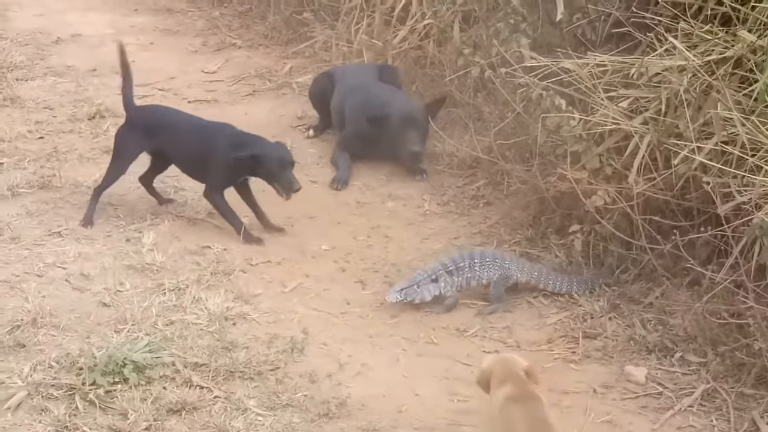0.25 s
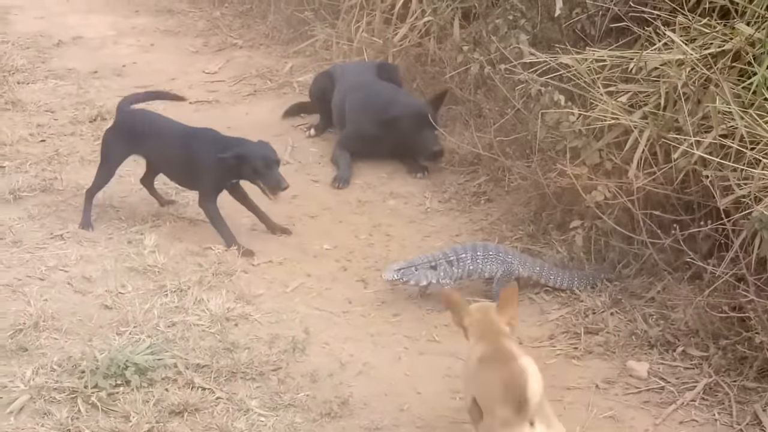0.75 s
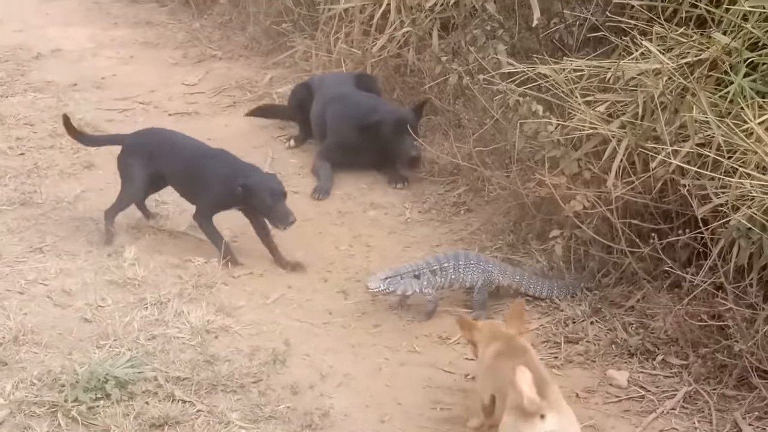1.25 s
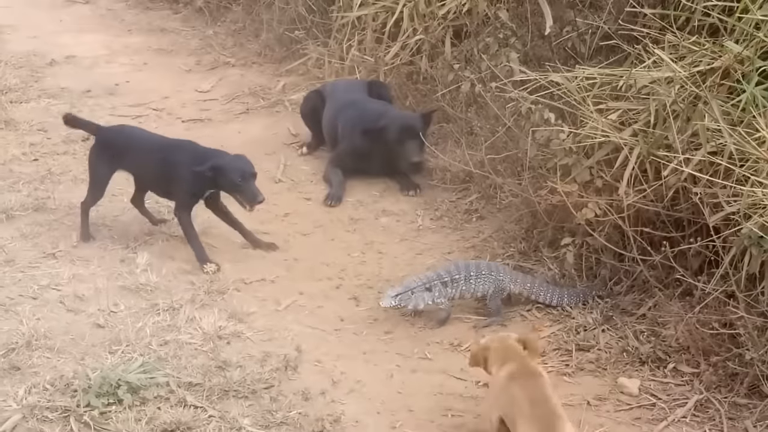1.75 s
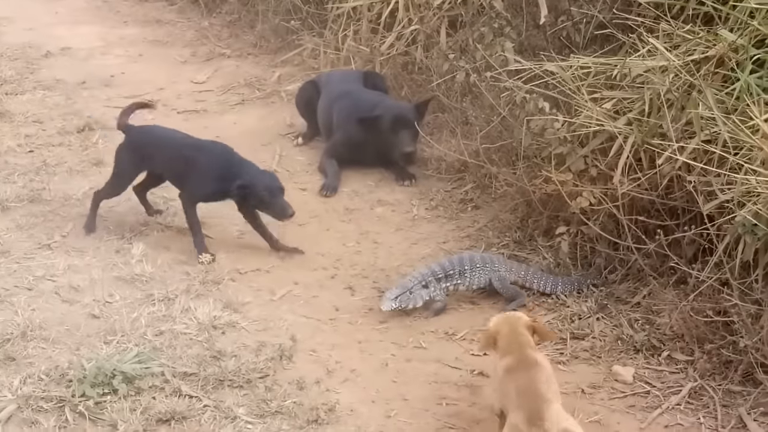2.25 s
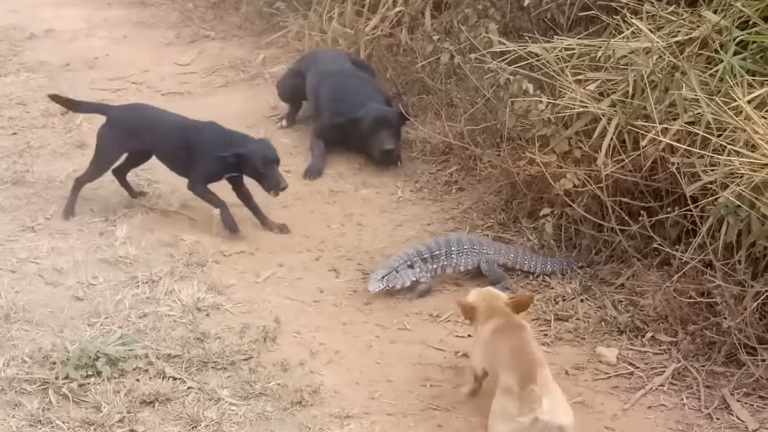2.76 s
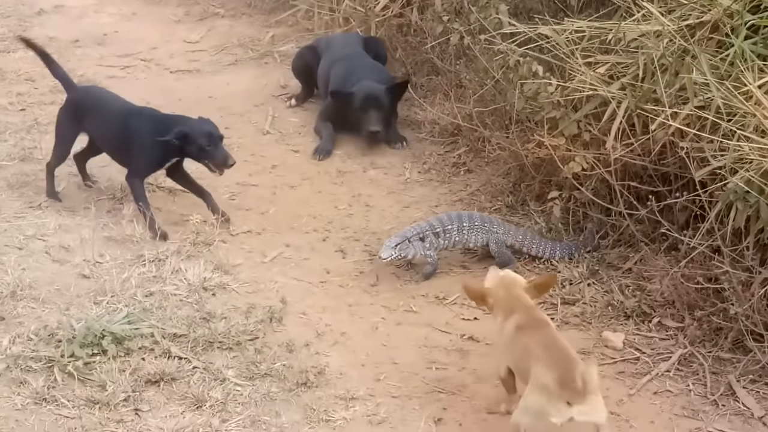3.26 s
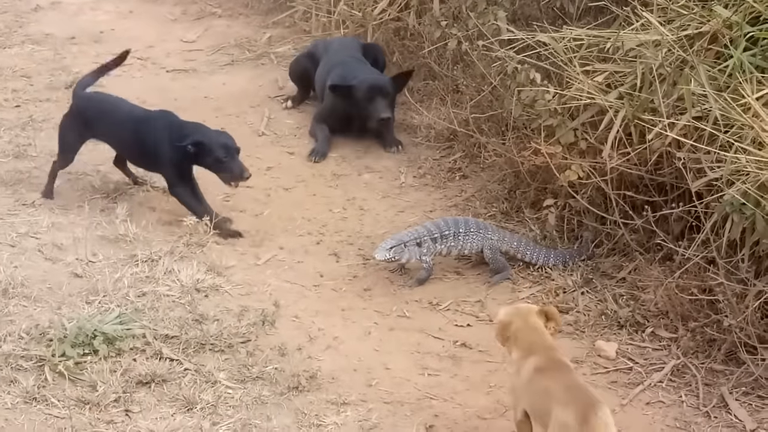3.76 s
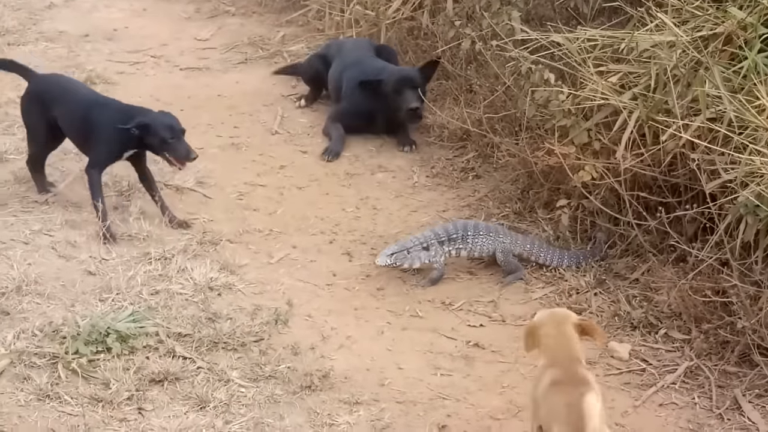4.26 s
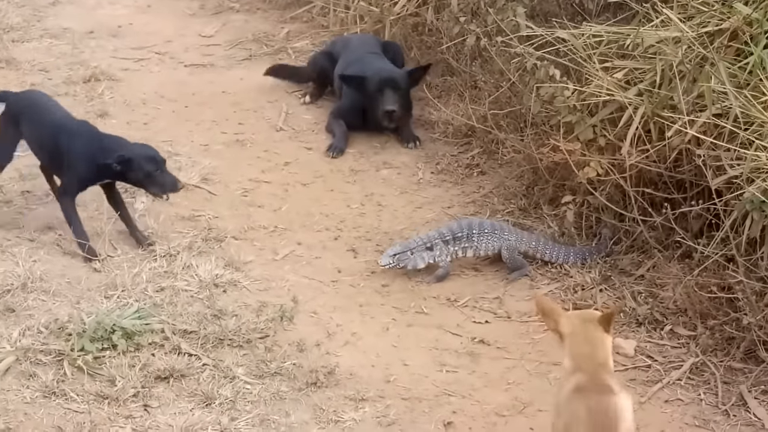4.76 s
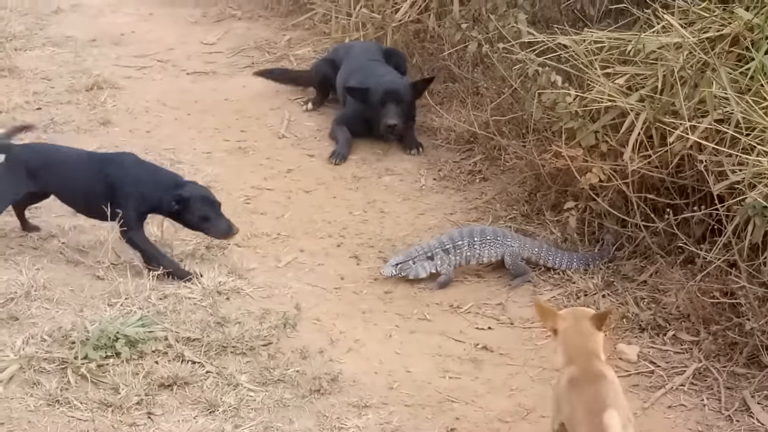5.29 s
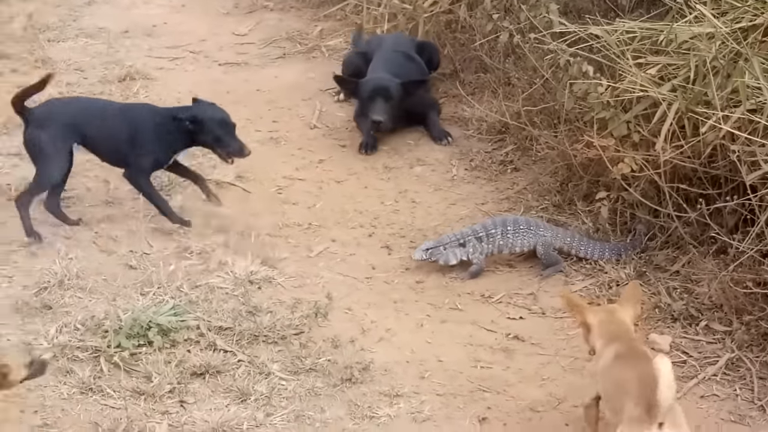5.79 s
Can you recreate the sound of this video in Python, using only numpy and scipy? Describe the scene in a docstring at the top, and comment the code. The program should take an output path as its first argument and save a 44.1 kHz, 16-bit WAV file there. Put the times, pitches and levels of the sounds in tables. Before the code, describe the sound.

Outdoors on a dirt path, several excited dogs keep up a rapid volley of piercing yelps, raspy yaps and rough barks, each arching quickly in pitch. Paws scrape softly in the dust. One dog moans low around the middle, beside a short grass rustle, and later one gives a wavering whine, followed by a few twig ticks. The bushes echo faintly, and the nearby hand-held microphone picks up low rumble and closing finger knocks.

```python
"""On a dirt path, three dogs shriek, yap, yelp and bark at a lizard, with a whine and a low moan between.
Each sharp call is an arch of pitch: the vocal folds start hoarse, often jump register, clear at the top
and slide away, coloured by throat and mouth. Paws scuff the dust, grass rustles and dry stalks crack.
The brush answers faintly; the hand-held microphone rumbles and a limiter levels the loudest calls."""
import sys
import numpy as np
from scipy import signal
from scipy.fft import rfft, irfft, next_fast_len
from scipy.io import wavfile
from scipy.ndimage import uniform_filter1d, minimum_filter1d, map_coordinates

SR = 44100
rng = np.random.default_rng(int(sys.argv[2]) if len(sys.argv) > 2 else 0)


def digitize_waveform(pressure):
    """Quantize a signal to 16-bit integers and store it at the path in sys.argv[1].

    Rows of a 2-D input are taken as channels; values are limited to [-1, 1].
    """
    field = np.atleast_2d(pressure).T
    bounded = np.clip(field, -1, 1)
    quanta = np.round(bounded * 32767).astype(np.int16)
    wavfile.write(sys.argv[1], SR, quanta)


N = 265923
TOP_HZ = 15800
# Dull hiss of dust and of outdoor air: (frequency [Hz], level [dB])
SOFT_HISS = [(30, -31), (90, -14.5), (600, -1), (2000, -23.5), (12000, -41.5)]
# The arch that yelps and squawks share
YELP_ARCH = dict(climb_bend=1.5, drop_bend=3.1, sag_db=9, fade_db=22.5, kink=.4, let_go_db=2,
                 clear_db=4.5, tail=1.4)


def amp(db):
    """Decibels to gain."""
    return np.exp(np.asarray(db) * (np.log(10) / 20))


def along(points, hz):
    """(Hz, value) points read on a log axis."""
    f, v = np.transpose(points)
    return np.interp(np.log(hz + 1), np.log(f + 1), v)


def wobble(rate, size):
    """A smooth random curve with rate knots a second."""
    knots = rng.standard_normal(int(size * rate / SR) + 4)
    return map_coordinates(knots, [np.arange(size) * rate / SR], mode="nearest")


def wander(count, rate, size):
    """A stack of count random zigzags with rate knots a second."""
    at, part = np.divmod(np.arange(size) * rate / SR, 1)
    at = at.astype(int)
    knots = np.float32(rng.standard_normal((count, at[-1] + 2)))
    return knots[:, at] + np.diff(knots)[:, at] * np.float32(part)


def coloured(x, spectrum):
    """x shaped by a spectrum, at rms 1."""
    m = next_fast_len(len(x) + 1024)
    shaped = irfft(rfft(x, m) * amp(along(spectrum, np.fft.rfftfreq(m, 1 / SR))), m)[:len(x)]
    return shaped / np.sqrt(np.mean(shaped ** 2) + 1e-20)


def add(track, s, sound):
    """Mix a sound into the track from time s on."""
    at = round(s * SR) + np.arange(len(sound))
    inside = (at >= 0) & (at < len(track))
    track[at[inside]] += sound[inside]


def arch(row, climb_bend, drop_bend, sag_db, fade_db, kink, let_go_db, clear_db=0, tail=1):
    """One push of air: the voice scoops up, breaks into a clear top, lets go and slides away."""
    start, rise, fall, top_hz, climb, drop, break_s, leap, tone_db, rasp_db, late_rasp_db, _ = row
    switch_s, lead_s = .003, .04  # a register change; how long before the top the push eases
    let_go = .57  # share of the fall after which the folds release
    t = np.arange(0, rise + fall * tail, 1 / 1000)
    climbing, falling = np.clip(1 - t / rise, 0, 1), np.maximum((t - rise) / fall, 0)
    chest = (1 - np.tanh((t - break_s) / switch_s)) / 2
    released = (1 + np.tanh((t - rise - let_go * fall) / switch_s)) / 2
    # Higher bends flatten the top; kink blends in straight glides with sharp corners.
    rounded = climb * climbing ** climb_bend + drop * falling ** drop_bend
    straight = climb * np.maximum(1 - t / break_s, 0) + drop * np.maximum(falling - let_go, 0) / (1 - let_go)
    octaves_down = np.minimum((1 - kink) * rounded + kink * straight + leap * chest, 2)
    slack = np.maximum(octaves_down, 0) * (1 - .32 * chest)  # the chest register carries low notes better
    easing = np.clip((t - rise + lead_s) / (fall + lead_s), 0, 1)
    push_db = -fade_db * easing ** 3.3 - let_go_db * released
    tone = tone_db + push_db - sag_db * slack + clear_db * (1 - chest)
    rasp = chest * rasp_db + (1 - chest) * late_rasp_db + push_db
    return np.transpose([start + t, top_hz / 2 ** octaves_down, tone, rasp, chest])


def throat_of(voice):
    """The resonances of throat and mouth for one kind of call."""
    # Open mouth: (frequency [Hz], shriek [dB], yelp [dB], yap [dB], bark [dB])
    open_mouth = [(266, -39.5, -25, -11, -19.5), (453, -13.5, -8, -5.5, -18.5), (703, 0.5, -16.5, 2.5, -4),
                  (1094, -1.5, 0, 8, 8), (1554, 1.5, 16, 14.5, 7), (1750, 8.5, 8, -12, -2),
                  (2385, 4.5, 16.5, 2.5, 1), (2665, 2, -10, -8.5, -8), (3270, -17.5, -6, -10, -15.5),
                  (4565, -11.5, -3, -19.5, -22.5), (5650, -16.5, -27.5, -30, -29.5),
                  (5988, -32.5, -31.5, -39, -35.5), (7270, -12, -15.5, -18, -18.5),
                  (8520, -32, -34.5, -35, -26), (8540, -45.5, -42.5, -38.5, -24.5),
                  (16000, -48.5, -36.5, -53.5, -50.5)]
    # Nearly closed muzzle: (frequency [Hz], level [dB])
    muzzle = [(300, -20), (580, 9.5), (1100, 2.5), (1800, 8.5), (2500, -14), (3400, -2.5), (4500, -36.5),
              (6000, -32), (12000, -55.5)]
    if voice == "muzzle":
        return muzzle
    column = 1 + ("shriek", "yelp", "yap", "bark").index(voice)
    return [(row[0], row[column]) for row in open_mouth]


def call(contour, voice, slope_db, doubling, jitter, rasp_db, breath_db, chaos,
         treble_db=0, bite_db=-60, fray=.27, ripple_db=6, growl=.3):
    """Vocal folds turn chaotic as rasp takes over, heard through the mouth; gives (start, sound)."""
    # The blast of air that opens a call: (frequency [Hz], level [dB])
    blast = [(400, -25.5), (1000, -3.5), (1500, -3), (2300, -2), (3100, -14.5), (4500, -10), (5500, -13.5),
             (6200, -35.5), (7600, -16), (8900, -45.5), (15000, -58.5)]
    fade_s, swell_s, bite_s = .005, .021, .041
    slip_hz, growl_hz, ripple_spacing_hz = 260, 134.1, 328.3
    s, *curves = np.transpose(contour)
    t = np.arange(s.min() - fade_s, s.max() + fade_s, 1 / SR)
    n, age = len(t), t - t[0]
    pitch, tone, rasp, chest = [uniform_filter1d(np.interp(t, s, c), size=120) for c in curves]
    # A wide-open mouth lifts the treble band.
    throat, blast = [[(hz, db + treble_db * (2900 < hz < 6000)) for hz, db in colour]
                     for colour in (throat_of(voice), blast)]
    hoarse = 1 / (1 + amp(tone - rasp))
    order = np.arange(.5, min(11, TOP_HZ / pitch.max()), .5)[:, None]
    halfway = order % 1 > 0  # paired cycles sound between the harmonics
    # Hoarse folds lurch in pitch as well as trembling from cycle to cycle.
    lurch = .016 * wobble(80, n)
    quaver = .005 * (wobble(52.6, n) + wobble(120, n))
    pitch = pitch * (1 + quaver + hoarse * chaos * (lurch + jitter * wobble(350, n)))
    phase = np.float32(order * (2 * np.pi * np.cumsum(pitch) / SR) + rng.uniform(0, 2 * np.pi, order.shape))
    slip = wander(len(order), slip_hz, n)
    # Gliding overtones flare and break in the mouth's narrow peaks and dips.
    grid = np.arange(0, TOP_HZ, 40)
    ripple = ripple_db * wander(1, SR * 40 / ripple_spacing_hz, len(grid))[0]
    mouth_db = along(throat, grid) + ripple * np.clip(grid / 2900, 0, 1) ** 2
    flicker_db = 7 * wander(len(order), 45, n) * (order > 1)
    mouth = amp(np.interp(order * pitch, grid, mouth_db) + flicker_db)
    # Regular vibration: harmonics grow duller once the push of air is spent.
    spent_db = (tone.max() - tone) * (t > t[tone.argmax()])
    tilt_db = slope_db * (1 - hoarse) - .086 * np.minimum(spent_db, 20)
    clean = mouth * amp(tilt_db * np.log2(np.maximum(order, 1)))
    clean *= np.where(halfway, doubling * np.maximum(hoarse, chest), 1)
    voiced = partials(clean, np.sin(phase + fray * (order - 1) * slip))
    # Rough vibration: cycles pair up and slip; low partials keep a core, high ones smear into noise.
    ragged = mouth * np.where(halfway, doubling, 1) * np.minimum(order, 1)
    rattle = partials(ragged, np.cos(phase + chaos * np.sqrt(order) * slip))
    # Air escapes in puffs, one for each pair of cycles; the first blast bites before the folds settle.
    puffs = 1 + np.cos(phase[0])
    breath = amp(breath_db) * coloured(puffs * rng.standard_normal(n), throat)
    bite = coloured(puffs * rng.standard_normal(n), blast)
    bite *= amp(bite_db + tone.max()) * np.exp(-(age / bite_s) ** 2)
    judder = amp(2 * wobble(130, n))
    shimmer_db = 3 * hoarse * wobble(300, n)
    sound = voiced * amp(tone + shimmer_db) + judder * ((rattle + breath) * amp(rasp + rasp_db) + bite)
    # Loose tissue above the folds flaps, chopping the voice into uneven beats.
    flap = 2 * np.pi * np.cumsum(growl_hz * (1 + .2 * wobble(90, n))) / SR
    sound *= 1 + growl * hoarse * np.cos(flap)
    swell = 1 - np.exp(-age / swell_s)
    gate = np.clip(np.minimum(age, t[-1] - t) / (2 * fade_s), 0, 1)
    return t[0], sound * swell * np.sin(gate * np.pi / 2) ** 2


def partials(gains, waves):
    """Weighted waves summed at steady power."""
    return (gains * waves).sum(0) / np.sqrt((gains ** 2).sum(0) / 2)


def volley(rows, shape, voice, **folds):
    """A track of arched calls, one for each row."""
    track = np.zeros(N)
    for row in rows:
        add(track, *call(arch(row, **shape), voice, treble_db=row[-1], **folds))
    return track


def muzzled(points, rasp_offset_db, slope_db):
    """One long call from relaxed folds through a nearly closed muzzle, its rasp far under its tone."""
    contour = [(s, hz, db, db + rasp_offset_db, 0) for s, hz, db in points]
    track = np.zeros(N)
    add(track, *call(contour, "muzzle", slope_db, doubling=.04, jitter=.006, rasp_db=0,
                     breath_db=-15, chaos=.8, fray=.06, ripple_db=3))
    return track


def shrieks():
    """Thin, high calls: the folds ring nearly pure at the top."""
    # Shrieks: (start [s], rise [s], fall [s], top [Hz], climb [oct], drop [oct], break after start [s],
    # leap [oct], tone [dB], early rasp [dB], late rasp [dB], treble [dB])
    calls = [ (-.04, 0.067, 0.041, 2089, 0.28, 0.7, 0.027, 0.07, -9.5, -20, -17, 8.5),
             (.548, 0.09, 0.04, 2131, 1.25, 0.56, 0.046, 0, -11, -11.5, -15.5, 5.5),
             (1.165, 0.081, 0.013, 2246, 0.34, 0.031, 0.036, 0.036, -20, -21.5, -25, 5.5),
             (1.584, 0.081, 0.049, 2077, 1.2, 0.26, 0.062, -0.028, -11.5, -11, -7.5, 3),
             (2.108, 0.044, 0.044, 1768, .2, 0.21, .039, -0.37, -8, -46, -40.5, -4.5),
             (2.191, 0.042, 0.053, 1697, 1.4, 0.049, 0.025, -0.094, -11, -21, -18.5, 7.5),
             (2.241, 0.024, 0.041, 2078, 0.16, 0.2, 0.013, -0.03, -7, -9, -3, -1),
             (2.672, 0.051, 0.021, 2144, 0.0071, 0.1, 0.034, 0.15, -13, -19, -21.5, -12),
             (2.981, 0.055, .045, 2118, 0.78, 0.45, .04, 0.12, -10, -10.5, -25, 2),
             (4.141, 0.016, 0.037, 2058, 0.16, 0.13, 0.014, -0.093, -15, -13.5, -10, -1.5),
             (4.468, 0.07, 0.049, 2113, 0.57, 0.34, 0.033, 0.068, -9, -29.5, -39, 4),
             (5.765, 0.068, 0.04, 2243, 0.96, 0.84, 0.031, 0.051, -10.5, -24, -30, 9.5), ]
    shape = dict(climb_bend=2.3, drop_bend=2.5, sag_db=15.5, fade_db=18.5, kink=.22, let_go_db=5)
    return volley(calls, shape, "shriek", slope_db=-2, doubling=.18, jitter=.016,
                  rasp_db=-8, breath_db=-3, chaos=1)


def yaps():
    """Raspy calls whose pitch turns sharp corners."""
    # Yaps: (start [s], rise [s], fall [s], top [Hz], climb [oct], drop [oct], break after start [s],
    # leap [oct], tone [dB], early rasp [dB], late rasp [dB], treble [dB])
    calls = [ (-.03, 0.057, 0.072, 1439, 0.46, 1.6, 0.05, 0.073, -18.5, -28.5, -45.5, 2),
             (0.587, 0.044, 0.1, 1541, 0.25, 2, 0.026, 0.1, -15.5, -23.5, -28, 10),
             (0.781, 0.075, 0.077, 1463, 0.98, 1.3, .051, .03, -13, -17, -56, 7),
             (1.105, 0.081, 0.098, 1502, 1.1, 0.84, 0.045, 0.011, -15, -28.5, -20, 7),
             (1.316, 0.083, 0.078, 1356, 1.2, .85, 0.054, 0.076, -10.5, -18, -55.5, -5.5),
             (1.693, 0.061, 0.041, 1603, 0.55, 0.55, 0.041, 0.05, -17.5, -14.5, -32.5, 6),
             (1.88, 0.07, 0.099, 1366, .85, 2, .044, 0.06, -11.5, -18.5, -37, 2.5),
             (2.241, 0.044, 0.1, 1457, 0.089, 0.19, 0.033, 0.013, -21, -20, -15, 0.5),
             (2.421, .098, 0.07, 1357, 1.05, 1.7, 0.055, 0.043, -12.5, -19.5, -52.5, 0.5),
             (2.698, 0.066, 0.066, 1327, 1, 2.2, 0.045, 0.016, -11, -16, -29, -14.5),
             (2.792, 0.042, 0.076, 1472, .06, 1, .043, 0.11, -13, -14, -22.5, 1),
             (2.985, 0.1, 0.046, 1526, .3, 0.76, 0.07, 0.041, -17, -20, -16.5, 3.5), ]
    shape = dict(climb_bend=2.2, drop_bend=2.2, sag_db=10, fade_db=13, kink=.8, let_go_db=6, clear_db=2.5)
    return volley(calls, shape, "yap", slope_db=-3, doubling=.44, jitter=.02,
                  rasp_db=2, breath_db=-11, chaos=.85, bite_db=-25)


def handling():
    """The hand on the microphone makes a lumpy rumble; fingers knock softly on the case."""
    # Swell of the rumble: (time [s], level [dB])
    grip = [(0, -54), (.95, -83.5), (1.15, -54), (1.45, -57), (1.921, -57), (2.0, -38), (2.14, -45.5),
            (2.23, -51), (2.32, -52.5), (2.9, -64), (3.21, -44.5), (3.33, -72.5), (3.481, -40),
            (3.619, -60), (4.5, -83), (4.8, -47.5), (4.92, -55.5), (5.86, -71.5), (5.925, -25.5),
            (5.965, -32.5), (6.018, -31)]
    # Colour of the rumble: (frequency [Hz], level [dB])
    colour = [(20, -13.5), (95, -4), (220, -6.5), (2000, -69.5)]
    # Finger knocks: (time [s], peak [dB])
    knocks = [(5.993, -13.5), (6.014, -8)]
    knock_hz = 139.6
    level = np.interp(np.arange(N) / SR, *np.transpose(grip))
    rumble = coloured(rng.standard_normal(N), colour) * amp(level + 4 * wobble(25, N))
    spread = (np.pi * knock_hz * (np.arange(SR // 10) / SR - .05)) ** 2
    for s, db in knocks:
        add(rumble, s - .05, amp(db) * (1 - 2 * spread) * np.exp(-spread))
    return rumble


def outdoor_air():
    """A faint, steady hiss."""
    return amp(-56.5) * coloured(rng.standard_normal(N), SOFT_HISS)


def barks():
    """Low, rich calls, ragged from a hard-flapping throat."""
    # Barks: (start [s], rise [s], fall [s], top [Hz], climb [oct], drop [oct], break after start [s],
    # leap [oct], tone [dB], early rasp [dB], late rasp [dB], treble [dB])
    calls = [ (.052, 0.027, 0.065, 582, .1, 0.45, 0.055, 0.0046, -12, -21, -8, 3),
             (0.154, 0.015, 0.054, 531, 0.012, 0.55, 0.028, 0.01, -24.5, -26.5, -39, -11.5),
             (1.216, 0.036, 0.06, 776, 0.12, 0.7, 0.031, 0, -21.5, -22.5, -15, -0.5),
             (2.611, 0.027, 0.066, 636.6, 0.058, 0.67, 0.013, 0.0067, -18.5, -16, -15.5, 9),
             (3.652, 0.039, 0.089, 702, 0.15, 0.16, 0.052, 0, -28, -13.5, -16.5, 7),
             (4.019, 0.096, 0.033, 698.4, 0.2, 0.23, 0.032, 0, -19.5, -16.5, -15.5, 2),
             (4.61, .073, 0.066, 765, 0.67, 0.6, 0.052, 0, -14.5, -18.5, -17.5, 6.5),
             (5.252, 0.065, 0.046, 789, .2, 0.96, 0.088, 0, -35.5, -18, -18, 7.5),
             (5.634, 0.064, 0.016, 774, 0.34, 0.068, 0.021, 0, -15, -37.5, -22, 11.5),
             (5.708, 0.013, 0.048, 528.5, 0.03, 0.56, 0.018, 0.0014, -9, -12, -19, 3), ]
    shape = dict(climb_bend=2.2, drop_bend=1.8, sag_db=2, fade_db=6, kink=0, let_go_db=2)
    return volley(calls, shape, "bark", slope_db=-3, doubling=.22, jitter=.016,
                  rasp_db=.5, breath_db=-17, chaos=.8, growl=.45)


def yelps():
    """A bite of air opens each call; the voice clears, then trails off in a faint slide."""
    # Yelps: (start [s], rise [s], fall [s], top [Hz], climb [oct], drop [oct], break after start [s],
    # leap [oct], tone [dB], early rasp [dB], late rasp [dB], treble [dB])
    calls = [ (0.237, 0.056, 0.085, 1630, 1.15, 1.7, .05, 0.095, -13.5, -16.5, -22.5, 1),
             (.318, 0.094, 0.042, 1812, 0.68, 0.38, 0.04, 0.071, -12, -15.5, -54.5, 5.5),
             (0.899, 0.097, 0.045, 1812, 0.51, 0.41, .037, 0.18, -12, -14.5, -65, 3),
             (1.11, 0.026, 0.068, 1588, 0.46, 0.7, 0.0428, -0.026, -8.5, -37, -28, -8),
             (1.458, 0.088, 0.039, 1793, 0.58, 0.26, 0.038, .2, -9.5, -20, -38.5, 1),
             (1.602, 0.035, 0.04, 1630, 0.051, 0.12, 0.05, 0.37, -9, -18.5, -26, -6),
             (2.07, 0.03, .025, 1340, 0.072, 0.012, 0.037, 0.038, -15.5, -11, -28.5, -2),
             (2.72, 0.043, 0.036, 1825, 0.17, 0.88, 0.0091, -0.19, -8.5, -18, -11.5, -14),
             (3.297, 0.1, 0.017, 1908, 0.73, 0.25, .038, 0.13, -10.5, -15, -20, -2.5),
             (3.323, 0.0075, 0.086, 1724, 0.0086, 0.45, 0.019, 0.047, -7.5, -17, -47, -1.5),
             (3.72, 0.0091, 0.081, 1616, 0.32, 0.68, 0.043, -0.066, -9.5, -31.5, -38, -13),
             (3.834, .08, 0.075, 1584, 0.11, 0.7, 0.067, 0.22, -12, -19, -30, 0),
             (3.977, 0.0014, 0.063, 1008, 0.014, 0.47, 0.018, -0.28, -15, -33, -30, 0.5),
             (4.214, 0.062, 0.057, 1697, 0.9, 1.3, .039, 0.35, -8.5, -17, -37, -3),
             (4.383, 0.087, 0.024, 1833, 0.49, 0.018, 0.039, 0.3, -11, -15, -26, 2),
             (4.912, 0.087, 0.043, 1740, 0.68, 0.72, 0.043, 0.13, -9, -22, -23.5, 2.5),
             (4.99, 0.063, 0.059, 1759, 0.18, 0.99, .055, 0.099, -10.5, -17, -13.5, -0.5),
             (5.452, 0.091, 0.036, 1834, 0.52, 0.45, .039, 0.17, -9, -21.5, -55, 1),
             (5.742, 0.041, 0.03, 1484, 0.16, 0.13, 0.02, 0.07, -7, -39.5, -18, -1), ]
    return volley(calls, YELP_ARCH, "yelp", slope_db=-6, doubling=.68, jitter=.018,
                  rasp_db=0, breath_db=-12, chaos=.75, bite_db=-16)


def paws():
    """Paws scuff the dust in short swells of gritty noise."""
    # Scuffs: (time [s], length [s], level [dB])
    scuffs = [(.44, .16, -37), (.72, .09, -33), (1.05, .05, -41), (3.274, .018, -35), (3.43, .1, -32),
              (3.77, .07, -38), (4.75, .1, -40)]
    track = np.zeros(N)
    for s, length, db in scuffs:
        n = int(length * SR)
        grit = coloured(rng.standard_normal(n) * amp(2.5 * wobble(200, n)), SOFT_HISS)
        add(track, s, amp(db) * grit * np.sqrt(np.hanning(n)))
    return track


def grumble():
    """A faint, dark mutter behind the muzzle."""
    # Path of the grumble: (time [s], pitch [Hz], level [dB])
    points = [(1.5, 205.8, -38.5), (1.6, 370, -42), (1.68, 266.7, -42.5), (1.76, 324, -49.5),
              (1.8, 260, -67)]
    return muzzled(points, rasp_offset_db=-11, slope_db=-29)


def squawks():
    """The folds settle into a clean paired cycle, with partials halfway between the harmonics."""
    # Squawks: (start [s], rise [s], fall [s], top [Hz], climb [oct], drop [oct], break after start [s],
    # leap [oct], tone [dB], early rasp [dB], late rasp [dB], treble [dB])
    calls = [ (1.778, 0.037, 0.059, 1416, 0.22, 0.38, 0.039, 0.086, -10.5, -27.5, -7, 4),
             (2.357, 0.057, 0.042, 1450, 0.54, 0.2, 0.019, -0.1, -12, -30.5, -9.5, 1),
             (3.5, 0.085, 0.071, 1436, 0.77, 0.71, 0.03, -0.33, -16.5, -12, -11, 3.5), ]
    return volley(calls, YELP_ARCH, "yelp", slope_db=-9.5, doubling=.83, jitter=.012,
                  rasp_db=-13, breath_db=-20, chaos=.14, bite_db=-13.5)


def moan():
    """A low voice swells and sinks behind the muzzle."""
    # Path of the moan: (time [s], pitch [Hz], level [dB])
    points = [(2.43, 285.5, -40), (2.5, 367.2, -35), (2.6, 335.7, -27), (2.69, 395.2, -20.5),
              (2.78, 295.8, -17.5), (2.83, 180.3, -38.5), (2.925, 202, -19), (2.972, 312.4, -10),
              (3.0, 292.3, -19.5), (3.04, 234.7, -41), (3.17, 157, -39)]
    return muzzled(points, rasp_offset_db=-17.5, slope_db=-6)


def grass():
    """Dry grass is brushed aside with a bright, flickering hiss."""
    # Rustles: (time [s], length [s], level [dB])
    rustles = [(2.708, .11, -24.5)]
    # Colour of dry blades: (frequency [Hz], level [dB])
    colour = [(3000, -20), (5500, 0), (7800, 0), (9000, -28), (15000, -38)]
    track = np.zeros(N)
    for s, length, db in rustles:
        n = int(length * SR)
        hiss = coloured(rng.standard_normal(n) * amp(2 * wobble(180, n)), colour)
        add(track, s, amp(db) * np.hanning(n) * hiss)
    return track


def whine():
    """A bright, wavering voice squeezed through the muzzle."""
    # Path of the whine: (time [s], pitch [Hz], level [dB])
    points = [(4.865, 933, -29.5), (4.895, 581.6, -25), (4.96, 660, -30), (5.085, 524.3, -44),
              (5.13, 785.4, -22), (5.22, 913, -10.5), (5.235, 1006, -11), (5.312, 1157, -17.5),
              (5.355, 980, -15.5), (5.435, 812, -19), (5.49, 565, -42.5)]
    return muzzled(points, rasp_offset_db=-16, slope_db=.5)


def twigs():
    """Dry stalks crack underfoot, each a tick of bright noise."""
    # Cracks: (time [s], level [dB])
    snaps = [(5.493, -33.5), (5.626, -33), (5.639, -24)]
    # Colour of a breaking stalk: (frequency [Hz], level [dB])
    colour = [(1000, -2.5), (3500, -20.5), (6500, -6), (8300, -18.5), (9500, -40), (15000, -26)]
    t60_s = .037
    track, t = np.zeros(N), np.arange(SR // 20) / SR
    for s, db in snaps:
        add(track, s, amp(db - 60 * t / t60_s) * coloured(rng.standard_normal(len(t)), colour))
    return track


def brush(x):
    """Diffuse answer of bushes and trees, weak and short in the bass, which passes through the stalks."""
    # Colour of the echo: (frequency [Hz], level [dB])
    colour = [(300, -13.5), (800, 0), (1400, 6), (2000, 1), (4400, 4.5), (10000, -4.5)]
    # Decay of the echo: (frequency [Hz], t60 [s])
    decay = [(300, .3), (800, .55), (1700, 0.89), (4400, 1), (10000, 1)]
    hz, t, noise = signal.stft(rng.standard_normal(SR), SR, nperseg=256)
    tail_db = along(colour, hz)[:, None] - 60 * t / along(decay, hz)[:, None]
    tail = signal.istft(noise * amp(tail_db), SR, nperseg=256)[1]
    return signal.fftconvolve(x, tail / np.linalg.norm(tail))[:N]


def scene():
    """The dogs on the path and their echo, over handling noise and air."""
    dogs = shrieks() + yelps() + squawks() + yaps() + barks() + whine() + moan() + grumble()
    near = dogs + paws() + twigs() + grass()
    echo = amp(-19.5) * brush(near)
    return (near + echo + handling() + outdoor_air())[None]


def record(dry):
    """A fast limiter ducks the mix under the loudest calls; stray peaks clip and the top end is cut."""
    ceiling = .62
    level = np.sqrt(2 * np.abs(uniform_filter1d(dry ** 2, size=70)))
    needed = np.minimum(1, ceiling / (level + 1e-9))
    gain = uniform_filter1d(minimum_filter1d(needed, size=260), size=200)
    held = np.clip(dry * gain, -.87, .87)
    m = next_fast_len(N + SR)
    return irfft(rfft(held, m) * (np.fft.rfftfreq(m, 1 / SR) < TOP_HZ), m)[:, :N]


dry = scene()
out = record(dry)
digitize_waveform(out)
```